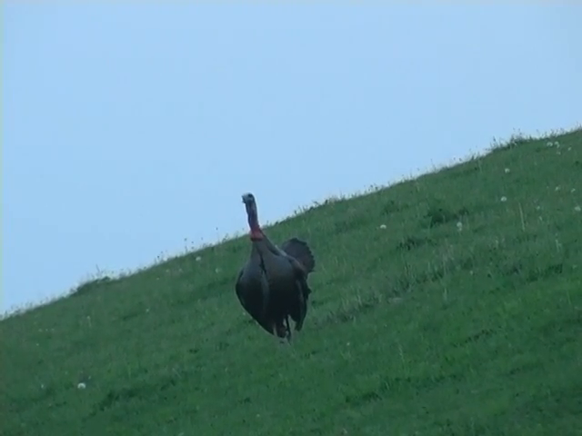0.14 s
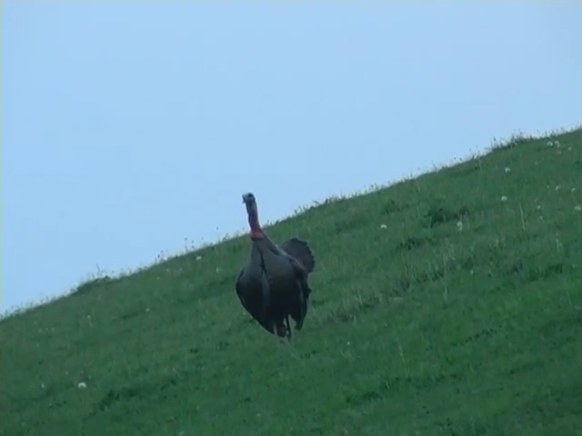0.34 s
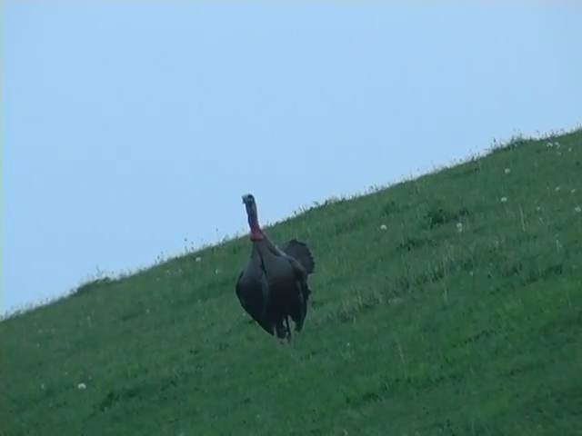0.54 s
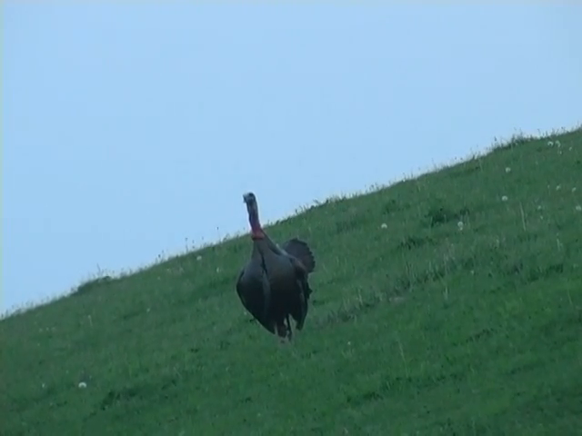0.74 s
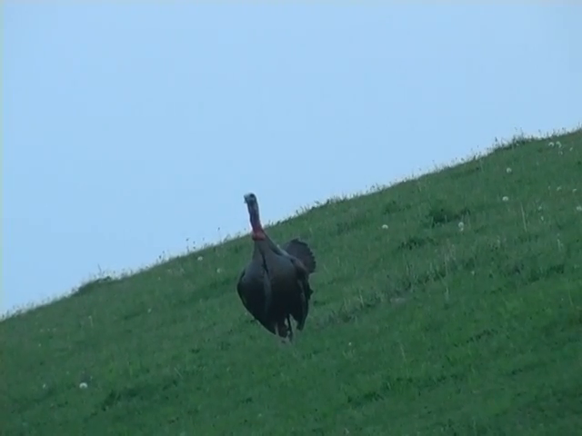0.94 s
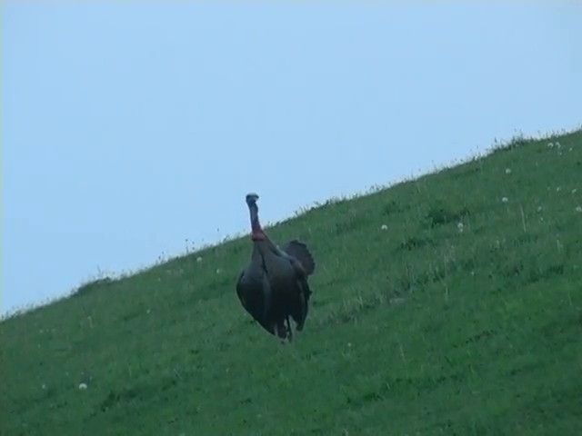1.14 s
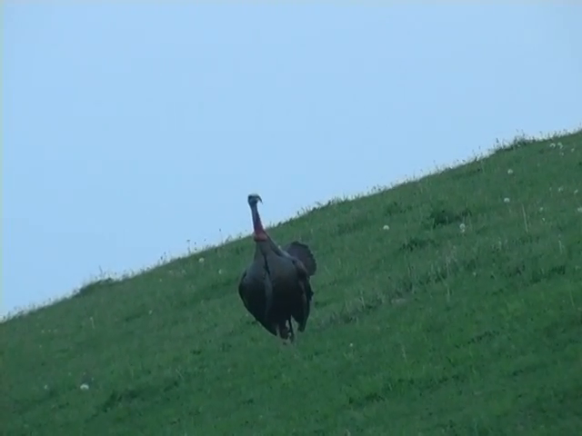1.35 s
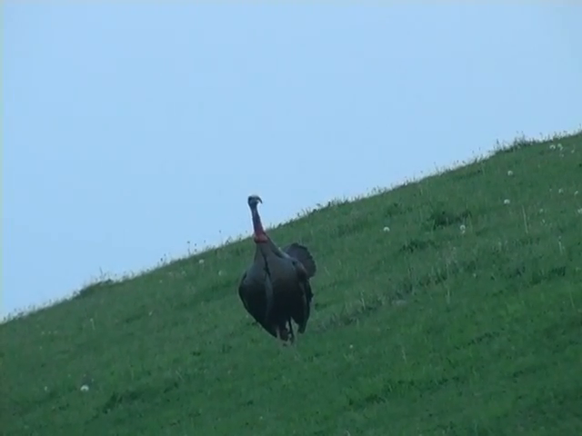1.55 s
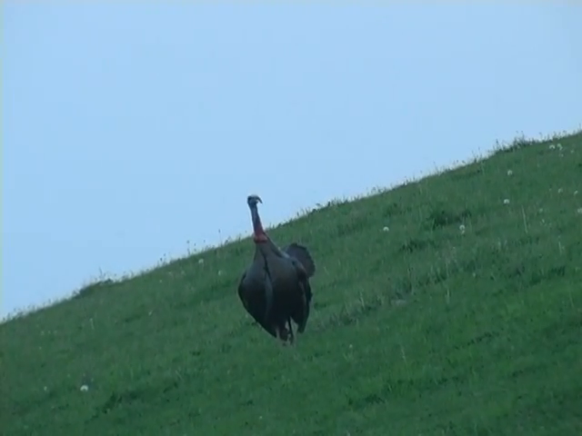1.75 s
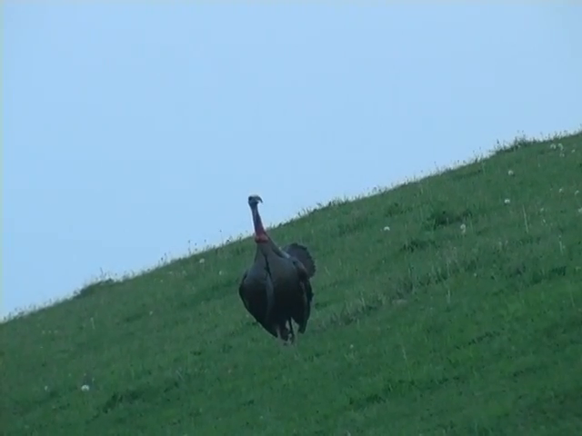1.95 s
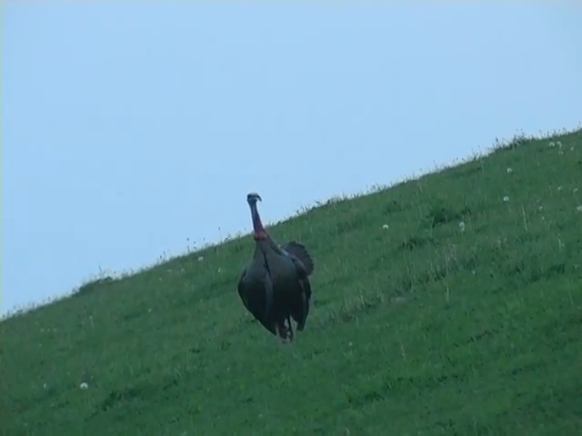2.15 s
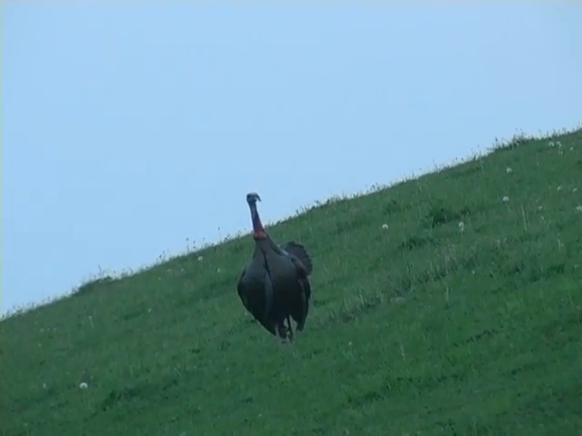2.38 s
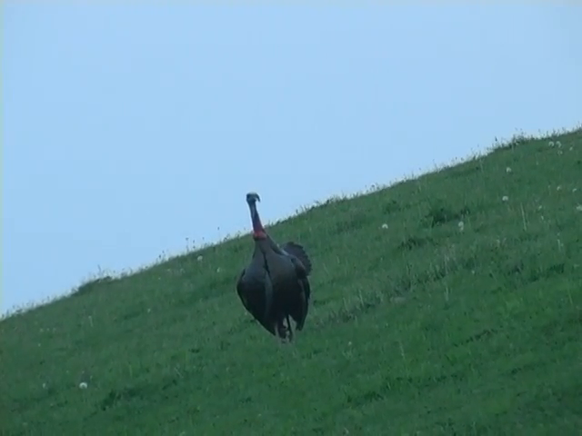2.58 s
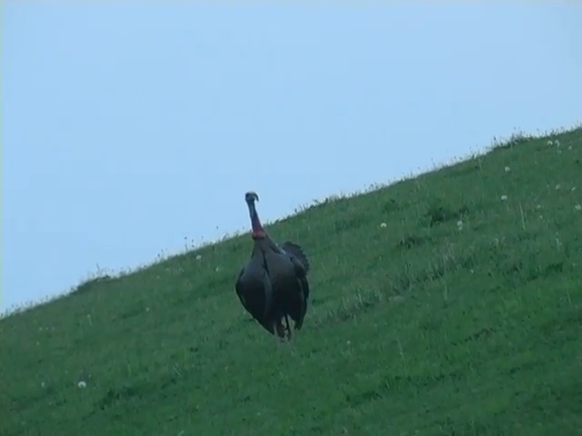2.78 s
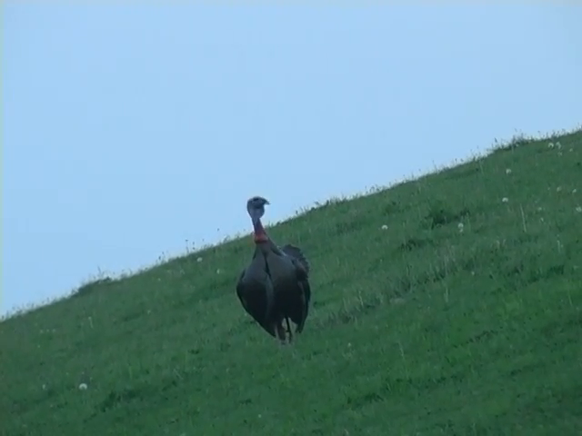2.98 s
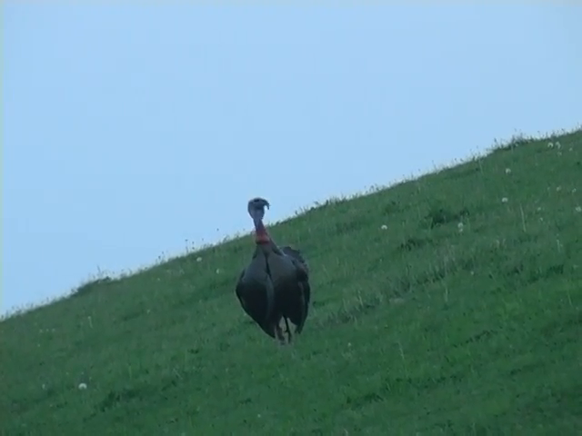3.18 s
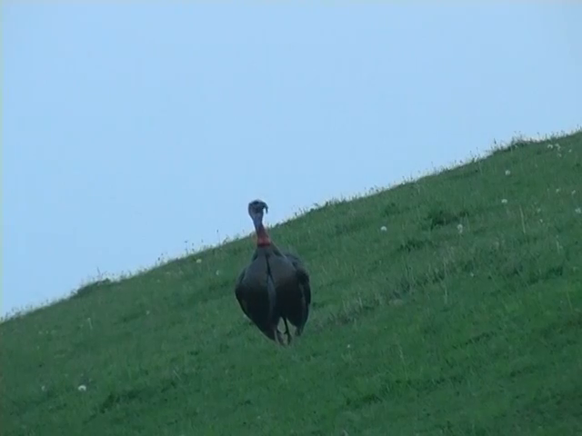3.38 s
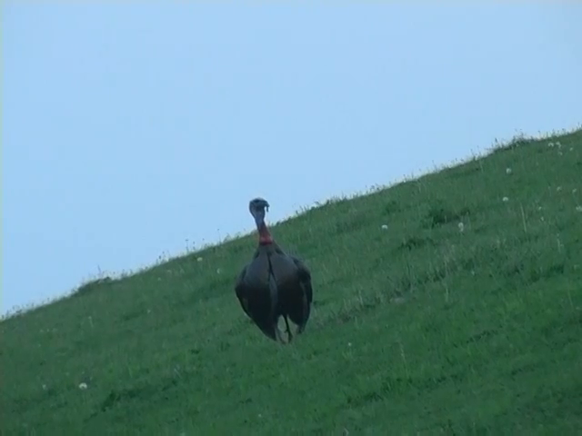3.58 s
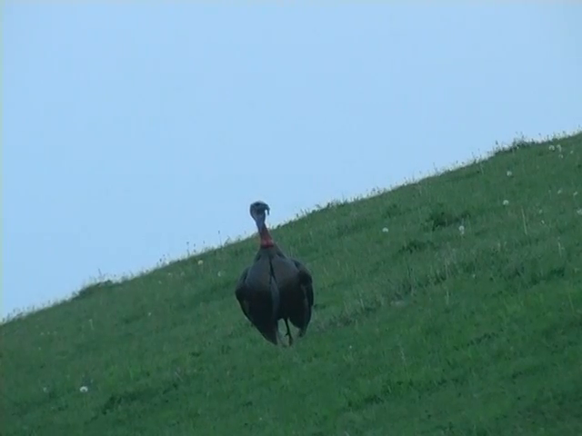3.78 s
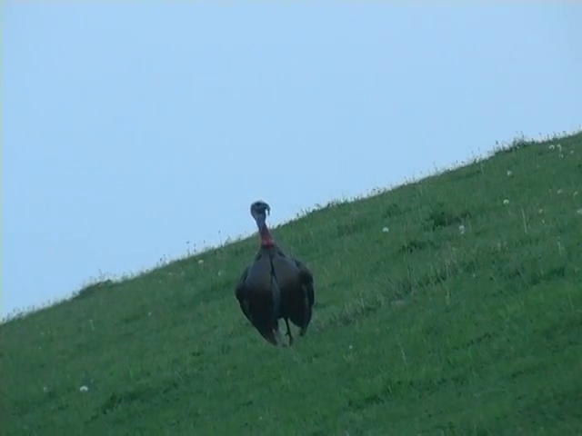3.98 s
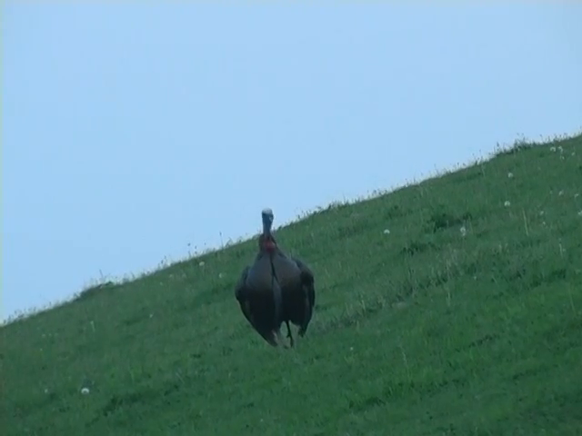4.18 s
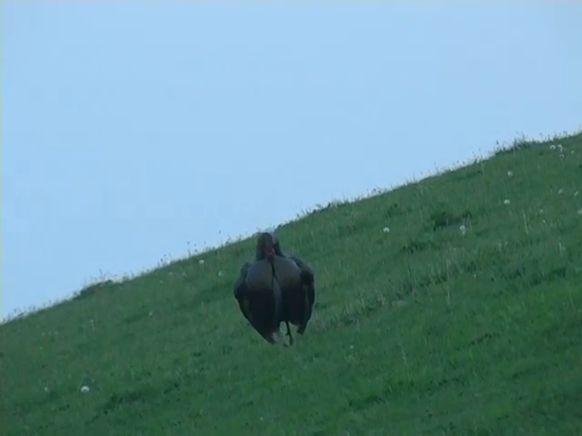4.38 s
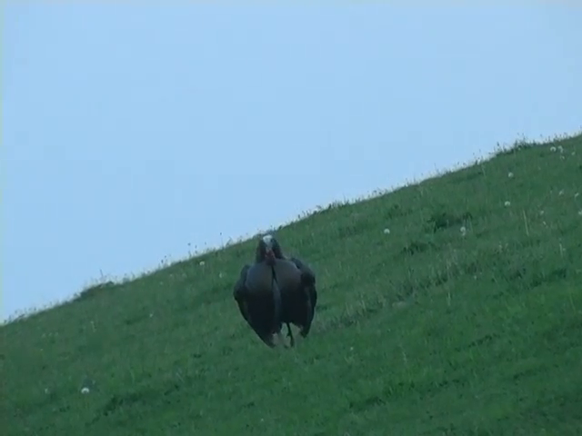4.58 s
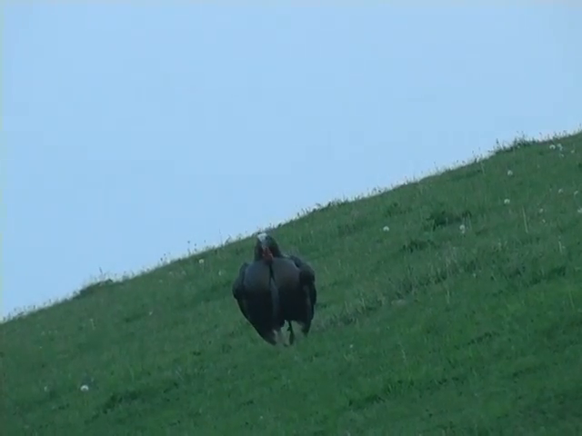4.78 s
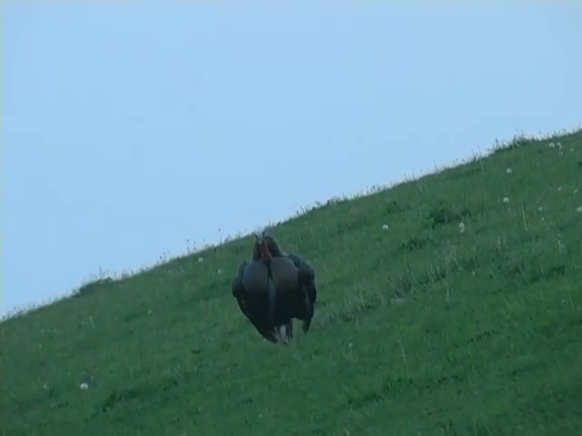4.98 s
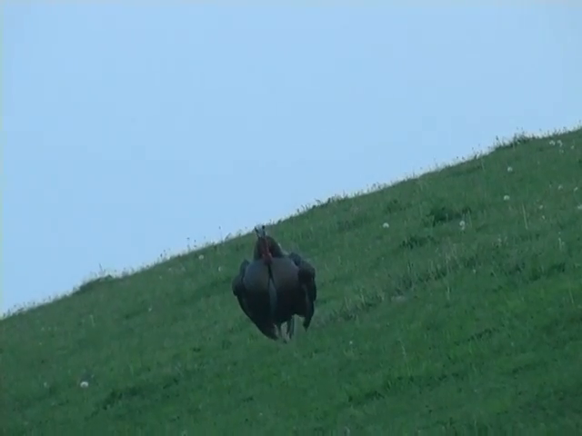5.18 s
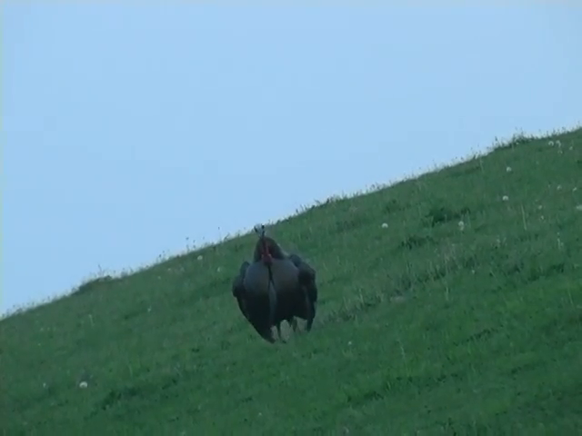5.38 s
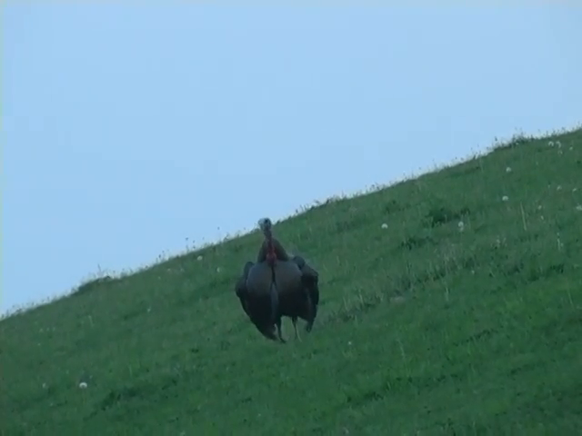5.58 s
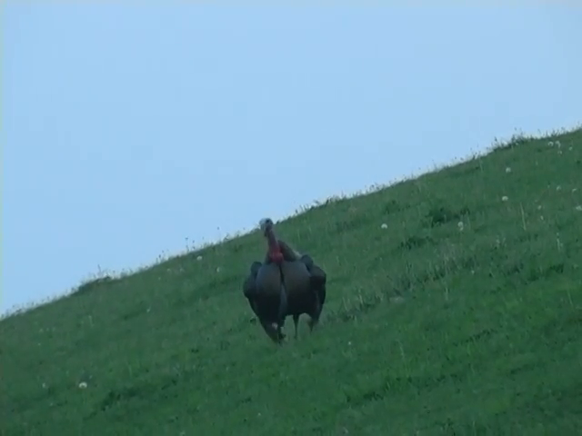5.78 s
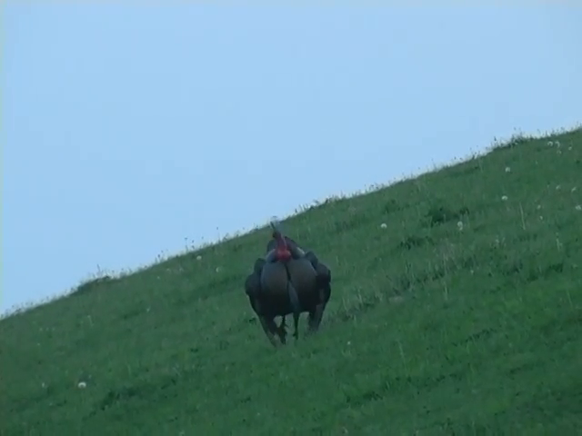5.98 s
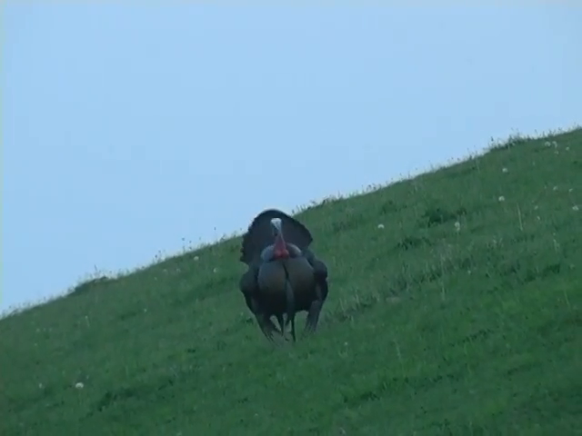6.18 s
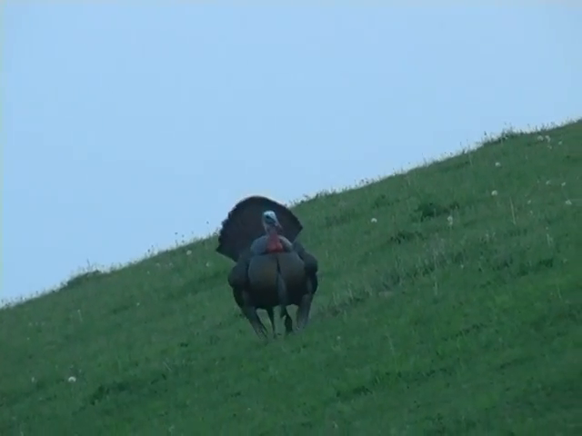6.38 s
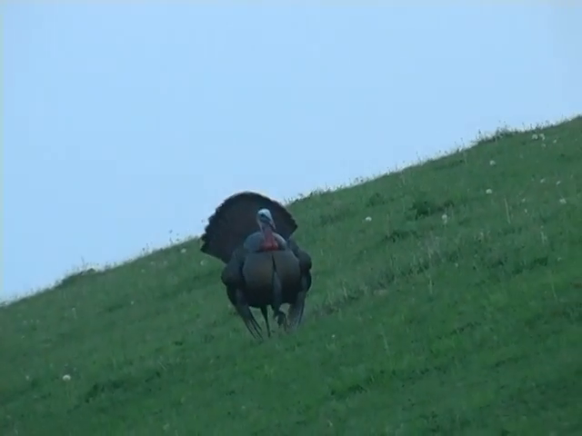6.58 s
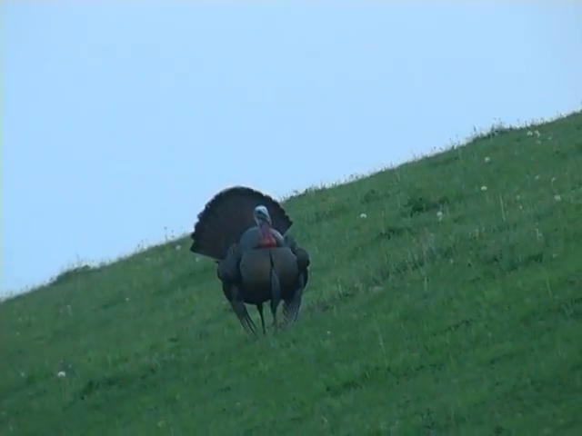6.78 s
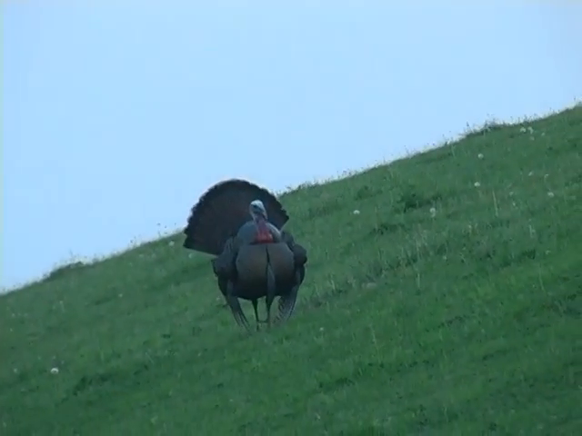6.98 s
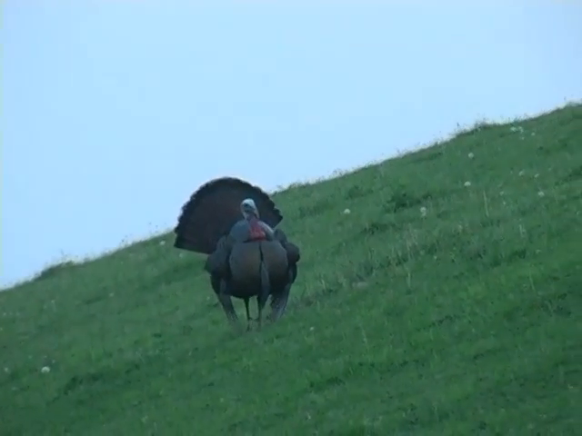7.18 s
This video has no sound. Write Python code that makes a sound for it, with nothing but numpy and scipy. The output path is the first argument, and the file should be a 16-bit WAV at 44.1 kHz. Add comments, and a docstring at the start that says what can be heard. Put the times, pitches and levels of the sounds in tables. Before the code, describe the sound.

Songbirds pipe, whistle and trill on an open hillside over soft air hiss and far engine rumble; midway a turkey gives one loud rattling gobble.

```python
"""On a grassy hillside a wild turkey gobbles once: short yelps, then an uneven, fading rattle of rasps.
Syrinx pulses ring its neck, throat and beak; brief tones on pitch curves make the yelps.
Songbirds to the left whistle, pipe, tick and trill as gliding tones, or wheeze as narrow hiss.
Near growth smears the calls and the slopes return a thin echo, as decaying noise.
Open-air hiss lies behind, a far engine rumbles and hums, and the camera adds a faint whine."""
import sys
import numpy as np
from scipy import signal
from scipy.fft import rfft, irfft
from scipy.io import wavfile
from scipy.ndimage import map_coordinates

SR = 44100
rng = np.random.default_rng(int(sys.argv[2]) if len(sys.argv) > 2 else 0)


def materialize(psi):
    """Save the field psi as 16-bit PCM at rate SR to the path in sys.argv[1].

    A 1-D psi becomes a single channel; in a 2-D psi each row is a channel.
    """
    bounded = np.clip(np.atleast_2d(psi).T, -1, 1)
    quanta = np.round(bounded * 32767).astype(np.int16)
    wavfile.write(sys.argv[1], SR, quanta)


N = 319284

GOBBLE_S = 4.2  # start of the gobble


def rattle():
    """Bursts of syrinx pulses, part steady and part ragged, ring the neck, the throat and the open beak."""
    # the rasps: middle t/s, length t/s, level/dB of throat and beak before the fades
    rasps = [(4.225, 0.023, -46), (4.303, 0.037, -40), (4.371, 0.0074, -46.5), (4.422, 0.017, -43.5),
             (4.463, 0.018, -44), (4.513, 0.044, -43), (4.589, 0.025, -44.5), (4.63, 0.033, -41.5),
             (4.686, 0.029, -39), (4.757, 0.016, -45.5), (4.791, 0.042, -43.5), (4.861, 0.045, -48),
             (4.945, 0.072, -46.5), (5.024, 0.034, -45.5), (5.095, 0.019, -48.5), (5.23, 0.032, -52.5),
             (5.264, 0.022, -58)]
    # throat resonances: f/Hz, width f/Hz, relative level/dB
    throat_modes = [(2150, 230, 4.5), (2440, 260, 7), (3100, 360, 9.5), (3580, 420, 7.5), (4300, 370, 5),
                    (4580, 320, 1)]
    # beak resonances: f/Hz, width f/Hz, relative level/dB
    beak_modes = [(5300, 260, -2.5), (5920, 240, 2), (6450, 340, 0), (7150, 740, -5), (8150, 1740, -16.5)]
    # one more throat resonance steps down as the neck stretches: t/s, f/Hz
    gullet_path = [(4.53, 1830), (4.62, 1555)]
    gullet_width_hz, gullet_db = 230, 6.5
    t = np.arange(N) / SR

    # the lowest resonance drops as the neck shoots out, then sinks steadily
    drop_hz, drop_s, sag_hz_per_s = 271.4, .11, 125
    age = np.maximum(t - GOBBLE_S, 0)
    neck_hz = 1074.7 + drop_hz * np.exp(-age / drop_s) - sag_hz_per_s * age

    def pulses(jitter):
        """One click a cycle, about an octave under the neck resonance, at uneven levels."""
        turns = np.cumsum(neck_hz / 2 * (1 + jitter * wander(N, 150))) / SR
        clicks = np.diff(np.floor(turns), prepend=0)
        return unit(clicks * amp(4 * wander(N, 300)))

    steady, ragged = pulses(jitter=.03), pulses(jitter=.35)
    low_cut = signal.butter(4, 650, "high", fs=SR, output="sos")
    drive = signal.sosfilt(low_cut, steady + 0.8 * ragged)

    neck_width_hz = 190
    shaky_neck_hz = neck_hz * (1 + 0.066 * wander(N, 90))
    neck = resonate(drive, shaky_neck_hz, neck_width_hz)
    neck = resonate(neck, shaky_neck_hz, 2 * neck_width_hz)
    shake = 1 + 0.023 * wander(N, 22)  # the shaking head detunes throat and beak
    throat, beak = (sum(amp(db) * band(drive, hz * shake, width) for hz, width, db in modes)
                    for modes in (throat_modes, beak_modes))
    gullet_hz = curves(gullet_path, t)[0] * shake
    throat = throat + amp(gullet_db) * band(drive, gullet_hz, gullet_width_hz)

    # under and between the bursts the neck keeps gurgling
    gurgle_db, gurgle_throat_db, gurgle_swing_db = -57, -4, 3.0
    end_s, release_s = 5.38, 0.16
    gurgle = unit(neck) + amp(gurgle_throat_db) * unit(throat)
    out = gurgle * amp(gurgle_db + gurgle_swing_db * wander(N, 50))
    out *= (t > GOBBLE_S) * np.clip((end_s - t) / release_s, 0, 1)

    flutter = amp(3 * wander(N, 200))
    for s, length, db in rasps:
        neck_db = -44 - 12 * (s - GOBBLE_S)  # the neck's ring fades by 12 dB/s
        open_db = 2.5 + 0.7 * (db + 39)  # a stronger rasp opens the beak wider and gains treble
        span = slice(round((s - length / 2) * SR), round((s + length / 2) * SR))
        voice = (throat[span] + amp(open_db) * beak[span]) * flutter[span]
        burst = amp(db) * unit(voice) + amp(neck_db) * unit(neck[span])
        add(out, s - length / 2, burst * signal.windows.tukey(len(burst), 0.58))
    return out


def yelps():
    """The voice locks into short tones with weak overtones, hoarse in the first outburst and clearer later."""
    # the tones: middle t/s, length t/s, level/dB before the fades, central f/Hz
    yelp_rows = [(4.216, 0.019, -40.5, 1416), (4.236, 0.029, -36.5, 1500), (4.238, 0.018, -35, 1810),
                 (4.283, .03, -37.5, 1356), (4.302, 0.03, -39, 1419), (4.413, 0.01, -43, 3150),
                 (4.457, 0.0099, -40, 3100), (4.471, 0.021, -43, 1853), (4.677, 0.02, -39.5, 3150),
                 (4.951, 0.036, -44.5, 3160), (4.966, 0.015, -43, 3630), (5.102, 0.01, -47, 3160),
                 (5.311, 0.014, -49.5, 3120), (5.314, 0.025, -47.5, 1590)]
    rough_first, rough_later, first_outburst_s = 0.62, 0.2, .15
    rise = 0.17  # share of its pitch by which a tone of roughness 1 would climb
    flutter_db, overtone_db = 7, -21  # flutter at roughness 1
    out = np.zeros(N)
    for s, length, db, pitch_hz in yelp_rows:
        size = round(length * SR)
        rough = rough_first if s < GOBBLE_S + first_outburst_s else rough_later
        hz = pitch_hz * (1 + rise * rough * np.linspace(-.5, .5, size))
        hz = hz * (1 + .2 * rough * np.tanh(wander(size, 600)))
        phase = 2 * np.pi * np.cumsum(hz) / SR
        # only the low tones have a third harmonic
        overtones = np.sin(2 * phase) + .5 * np.sin(3 * phase) * (pitch_hz < 2000)
        tone = np.sin(phase) + amp(overtone_db) * overtones
        tone = unit(tone * amp(flutter_db * rough * wander(size, 342)))
        add(out, s - length / 2, amp(db) * tone * signal.windows.tukey(size, .7))
    return out


def syllables(names, shake, hiss_db, hiss_width=2200):
    """Quick syllables that the birds repeat; a shaking pitch and a spray of hiss make them buzz."""
    # pitch curves by name: t/s from the start, f/Hz, relative level/dB
    shapes = { "dip": [(0, 5400, -8), (.012, 3650, -1), (.032, 3100, -8), (.056, 2600, -7), (.073, 3100, 1),
              (.097, 4080, 0), (.113, 4270, -6), (.14, 4200, -20)], "arch": [(0, 2650, -9), (.04, 3250, -3),
              (.06, 3400, -3), (.088, 3920, 1), (.1, 3700, 0), (.111, 2300, -8), (.128, 1850, -20)],
              "slide": [(0, 4900, -5), (.05, 3650, -2), (.175, 2200, 1), (.28, 1800, -4)],
              "pip": [(0, 1880, -10), (.018, 2070, 0), (.045, 1720, -6)]}
    # when they are sung: t/s, name, relative level/dB
    song = [(.094, "dip", -45), (.29, "arch", -50.5), (.355, "dip", -46.5), (.475, "arch", -49),
            (.626, "dip", -47), (0.736, "pip", -56), (0.906, "dip", -48), (0.916, "pip", -59),
            (1.715, "slide", -62.5), (2.246, "slide", -62.5), (2.802, "slide", -64.5), (3.787, "dip", -49),
            (4.052, "dip", -48), (4.324, "dip", -48.5), (5.945, "pip", -59), (6.039, "arch", -52),
            (6.238, "arch", -45), (6.452, "arch", -48), (6.689, "pip", -58), (6.843, "pip", -55),
            (7.004, "pip", -52.5)]
    # as the arch drops, the throat favours the octave: t/s from the start, octave level/dB
    arch_octave = [(.05, -18), (.1, -16.5), (.111, 9.5)]
    out = np.zeros(N)
    for s, name, db in song:
        if name in names:
            shape = shapes[name]
            t = np.arange(0, shape[-1][0], 1 / SR)
            hz, shape_db = curves(shape, t)
            octave_db = curves(arch_octave, t)[0] if name == "arch" else -np.inf
            tone = chirp(hz, db + shape_db, octave_db, shake)
            hiss = unit(band(rng.standard_normal(len(hz)), hz, hiss_width))
            add(out, s, tone + amp(db + shape_db + hiss_db) * hiss)
    return out


def upsweeps():
    """Thin, wheezy notes that start hoarse and clear as they climb by a fixed interval."""
    # start t/s, relative level/dB, first f/Hz
    sweeps = [(.705, -60.5, 4300), (.912, -63, 4050), (1.148, -64.5, 5300), (5.448, -57.5, 4450),
              (5.665, -57.5, 4400), (5.866, -58.5, 4370), (6.205, -65, 5750), (6.425, -63.5, 5850),
              (6.62, -63, 5350)]
    length_s, ratio, shake = 0.054, 1.39, 0.113
    out = np.zeros(N)
    for s, db, first_hz in sweeps:
        hz = glide(length_s, first_hz, first_hz * ratio)
        note = chirp(hz, db, shake=shake * np.linspace(1, 0, len(hz)))
        add(out, s, note * signal.windows.tukey(len(hz), .5))
    return out


def wheezes():
    """Breathy, falling wheezes of a small bird: noise through a sinking resonance."""
    # start t/s, length t/s, relative level/dB
    breaths = [(0.311, 0.078, -60), (0.502, 0.1, -62), (5.08, 0.37, -63.5), (6.073, 0.24, -57.5)]
    first_hz, last_hz, width_hz = 5340, 4800, 3200
    out = np.zeros(N)
    for s, length, db in breaths:
        hz = glide(length, first_hz, last_hz)
        hiss = band(rng.standard_normal(len(hz)), hz, width_hz)
        hiss = band(hiss, hz, width_hz)
        add(out, s, amp(db) * unit(hiss) * signal.windows.tukey(len(hz), .5))
    return out


def whistles():
    """Single clear notes: slurs glide and settle on another pitch, lilts rise to a top and fall back."""
    # slurs: start t/s, length t/s, level/dB, first f/Hz, last f/Hz
    slurs = [(0, 0.078, -58.5, 4200, 5220), (0.954, 0.12, -56, 3130, 2980), (1.264, .1, -60.5, 2360, 2080),
             (1.432, 0.079, -58.5, 2440, 2170), (1.713, .071, -56, 3010, 2710),
             (2.164, 0.087, -55.5, 3000, 2690), (3.185, 0.096, -64, 2850, 2610),
             (3.209, 0.071, -62.5, 2200, 1696), (3.585, 0.053, -55, 2760, 4430),
             (3.709, 0.072, -60, 2250, 1755), (4.798, 0.052, -59, 4770, 5430),
             (5.4, 0.075, -58.5, 4750, 3240), (5.646, 0.083, -59, 2700, 2100),
             (5.833, 0.2, -59.5, 2795, 2465), (5.859, 0.03, -55, 4780, 3730),
             (5.914, 0.15, -73.5, 6400, 6700), (6.462, 0.1, -56, 2950, 2605),
             (6.614, 0.028, -51.5, 3200, 2430), (6.745, 0.075, -53, 2950, 2700),
             (6.974, 0.086, -55, 3800, 3240), (7.042, 0.076, -51.5, 2740, 2440)]
    # lilts: start t/s, length t/s, level/dB, top f/Hz
    lilts = [(1.578, 0.037, -55.5, 2620), (3.4, 0.21, -59, 2706), (3.663, 0.1, -56, 2513),
             (3.936, 0.11, -57, 2470), (5.575, .095, -49.5, 3350), (5.731, 0.047, -52, 2947),
             (7.186, 0.042, -52, 3040)]
    out = np.zeros(N)
    for s, length, db, first_hz, last_hz in slurs:
        add(out, s, whistle(glide(length, first_hz, last_hz), db))
    for s, length, db, top_hz in lilts:
        add(out, s, whistle(bow(length, top_hz, bend=0.22), db))
    return out


def flicks():
    """Very short notes that flick upward, alone or strung into a warble."""
    # start t/s, level/dB, first f/Hz
    flick_rows = [(2.925, -62, 2940), (3.447, -58, 2530), (5.488, -54, 2930), (5.51, -50.5, 2624),
                  (5.537, -48.5, 2496)]
    length_s, ratio = 0.0242, 1.22
    out = np.zeros(N)
    for s, db, first_hz in flick_rows:
        add(out, s, whistle(glide(length_s, first_hz, first_hz * ratio), db))
    return out


def piping(count=5):
    """One bird pipes an even run of long, low notes that each creep upward and fade."""
    first_s, gap_s, note_s = -.02, .268, 0.196  # add() moves the first note to 0 s
    first_hz, last_hz, start_db, fade_db = 2365, 2538, -54.5, -4
    out = np.zeros(N)
    for k in range(count):
        hz = glide(note_s, first_hz, last_hz)
        db = start_db + np.linspace(0, fade_db, len(hz))
        add(out, first_s + k * gap_s, chirp(hz, db, shake=0.013))
    return out


def trill():
    """A falling buzz made of rapid downward sweeps."""
    # the path of the buzz: t/s, f/Hz, level/dB before the throb
    path = [(1.735, 3674, -52), (1.87, 3238, -49.5), (1.959, 2932, -49.5), (2.038, 2700, -53),
            (2.08, 2650, -73)]
    rate_hz, depth, throb = 58, 0.098, 0.24  # depth is a share of the pitch, throb an exponent
    t = np.arange(path[0][0], path[-1][0], 1 / SR)
    hz, db = curves(path, t)
    cycle = (t - t[0]) * rate_hz % 1
    sweep = chirp(hz * (1 + depth * (1 - 2 * cycle)), db)
    out = np.zeros(N)
    add(out, t[0], sweep * np.sin(np.pi * cycle) ** throb)
    return out


def ticks():
    """Tiny, high, scratchy falling notes in even runs."""
    # runs: first t/s, last t/s, level/dB
    runs = [(1.578, 1.9, -72), (2.66, 2.7, -76), (2.862, 3.08, -70.5), (4.075, 4.2, -74)]
    gap_s, length_s, first_hz, last_hz = .083, 0.024, 9500, 8470
    out = np.zeros(N)
    for first, last, db in runs:
        for s in np.arange(first, last, gap_s):
            add(out, s, chirp(glide(length_s, first_hz, last_hz), db, shake=0.045))
    return out


def far_birds(count=300):
    """A chorus from farther off: random chirps, up and down, that blend into a warble."""
    # t/s, level/dB of the loudest chirps
    chorus = [(.6, -58.5), (1.4, -82), (4.8, -75), (6.3, -59), (7.1, -60)]
    u = np.linspace(-1, 1, round(.06 * SR))
    out = np.zeros(N)
    for k, (when, pitch, bend, quiet) in enumerate(rng.random((count, 4))):
        s = (k + when) / count * N / SR
        hz = 2650 * 1.5 ** pitch * (1 + .13 * (2 * bend - 1) * u)
        db = curves(chorus, s)[0] - 10 * quiet
        add(out, s, chirp(hz, db) * np.hanning(len(u)))
    return out


def background():
    """Open-air hiss as shaped noise, with the rumble and wavering tones of a far engine."""
    # hiss spectrum: f/Hz, relative level/dB per Hz
    air = [(180, -26), (300, -2), (500, -1.5), (1050, 0), (1950, -12.5), (2800, -8), (4200, -15.5),
           (7000, -22.5), (10300, -21.5), (15700, -26.5)]
    # rumble spectrum: f/Hz, relative level/dB per Hz
    rumble = [(20, -32), (48, -10), (60, 0.5), (73, 3), (88, 0.5), (165, -4), (240, -11.5), (300, -22.5),
              (900, -109)]
    # engine tones: f/Hz, level/dB about which each wavers
    engine = [(58, -58), (72.4, -53.5), (144.9, -50.5), (252, -65)]
    # likeness of the two microphone ports: f/Hz, 0 to 1
    likeness = [(60, 0.99), (300, 1), (1000, 0.82), (3000, 0.23), (8000, 0.075)]
    # lean to the left: f/Hz, left minus right level/dB
    lean = [(60, 5), (1400, 3.8), (3100, 0), (7000, -0.5)]
    air_db, rumble_db, waver_db, drift = -55, -45, 2.0, 0.00604
    hz = np.fft.rfftfreq(N, 1 / SR)
    a, b = rfft(rng.standard_normal((2, N)))
    same = np.clip(read(likeness, hz), 0, 1)
    pair = np.array([a, same * a + np.sqrt(1 - same ** 2) * b])
    noise = amp(air_db) * unit(irfft(pair * amp(read(air, hz)), N))
    noise += amp(rumble_db) * unit(irfft(pair * amp(read(rumble, hz)), N))
    hum = np.zeros(N)
    for f, db in engine:
        level = amp(db + waver_db * wander(N, 2.2))
        phase = 2 * np.pi * np.cumsum(f * (1 + drift * wander(N, 3))) / SR
        hum += np.sqrt(2) * level * np.sin(phase)
    return ports(noise + hum, read(lean, hz), 1.0)


def whine():
    """Thin steady tones from the camera, alike in both ports."""
    # f/Hz, level/dB
    tones = [(4495, -82), (5394, -79), (5694, -82), (9340, -88), (15732, -83)]
    t = np.arange(N) / SR
    return sum(np.sqrt(2) * amp(db) * np.sin(2 * np.pi * (hz * t + rng.random())) for hz, db in tones)


def place(x, lean_db, side, echo_db, scatter_db):
    """A source to the left reaches the right port later and weaker; near growth smears it, slopes echo it."""
    # decay of the echo: f/Hz, time to fall by 60 dB t/s
    echo_decay = [(500, 0.27), (1200, 1), (6000, .8), (12000, 0.13)]
    hz, t, z = signal.stft(rng.standard_normal((2, SR)), SR, nperseg=256)
    tail_gain = amp(-60 * t / read(echo_decay, hz)[:, None]) * (t > .008)
    tail = signal.istft(z * tail_gain, SR, nperseg=256)[1]
    # the smear uses the same noise in swapped ports and dies within 0.087 s
    near = signal.istft(z[::-1] * amp(-60 * t / 0.087), SR, nperseg=256)[1]
    paths = amp(echo_db) * tail / np.linalg.norm(tail[0])
    paths += amp(scatter_db) * near / np.linalg.norm(near[0])
    paths[1] = .6 * paths[0] + .8 * paths[1]  # the ports hear partly the same reflections
    pair = x + signal.fftconvolve(x[None], paths, axes=1)[:, :N]
    return ports(pair, lean_db, side)


def ports(pair, lean_db, side):
    """Level and phase difference between the two microphone ports."""
    # lead of the left port at side 1: f/Hz, phase/radians
    lead = [(60, .05), (250, 0.81), (550, 1.46), (3000, 1.105)]
    lag = side * read(lead, np.fft.rfftfreq(N, 1 / SR))
    left, right = rfft(pair)
    left = left * amp(lean_db / 2)
    right = right * np.exp(-1j * lag) * amp(-lean_db / 2)
    return irfft(np.array([left, right]), N)


def chirp(hz, db, overtone_db=-38, shake=0.0065, flutter_db=2):
    """A songbird's near-pure tone on a pitch curve, with a shaking pitch and a fluttering level."""
    size = len(hz)
    phase = 2 * np.pi * np.cumsum(hz * (1 + shake * wander(size, 261.7))) / SR
    tone = np.sin(phase) + amp(overtone_db) * np.sin(2 * phase)
    level = amp(db + flutter_db * wander(size, 45.0))
    return np.sqrt(2) * tone * level * signal.windows.tukey(size, .1)


def whistle(hz, db):
    """One clear whistled note, swelling and fading."""
    return chirp(hz, db, shake=.012) * signal.windows.tukey(len(hz), .4)


def glide(length, first_hz, last_hz):
    """A pitch that moves fast at first and settles, over 1.566 time constants."""
    left = np.exp(-1.566 * np.linspace(0, 1, round(length * SR)))
    return last_hz + (first_hz - last_hz) * (left - left[-1]) / (1 - left[-1])


def bow(length, top_hz, bend):
    """A pitch that rises to its top and falls back; both ends lie a share bend under it."""
    return top_hz * (1 - bend * np.linspace(-1, 1, round(length * SR)) ** 2)


def band(x, hz, width):
    """A resonance applied twice, for steep sides."""
    return resonate(resonate(x, hz, width), hz, width)


def resonate(x, hz, width):
    """A resonance of gain 1 that may follow a curve: shift it to 0 Hz, smooth, shift back."""
    turn = np.exp(2j * np.pi * np.cumsum(hz * np.ones(len(x))) / SR)
    r = np.exp(-np.pi * width / SR)
    return 2 * (turn * signal.lfilter([1 - r], [1, -r], x / turn + 1e-18)).real


def wander(size, hz):
    """A smooth random curve of rms near 1 that moves up to hz times a second."""
    at = np.arange(size) * 2 * hz / SR
    return map_coordinates(rng.standard_normal(int(at[-1]) + 4), [at + 1], order=3, mode="nearest")


def amp(db):
    """Decibels to gain."""
    return 10 ** (np.asarray(db) / 20)


def unit(x):
    """Scales to rms 1."""
    return x / np.sqrt(np.mean(x ** 2) + 1e-20)


def read(points, hz):
    """Reads a spectrum on a log-frequency axis."""
    f, value = np.transpose(points)
    return np.interp(np.log(hz + 1), np.log(f + 1), value)


def curves(rows, t):
    """Reads every column of a time table at the times t."""
    s, *columns = np.transpose(rows)
    return [np.interp(t, s, c) for c in columns]


def add(mix, s, sound):
    """Mixes a sound in at s seconds, or at 0 if s is negative."""
    part = mix[max(round(s * SR), 0):][:len(sound)]
    part += sound[:len(part)]


def scene():
    """The turkey nearer to straight ahead, the songbirds to the left and farther away."""
    turkey = place(rattle() + yelps(), lean_db=2.0, side=0.73, echo_db=-12.5, scatter_db=-5.5)

    buzzy = syllables(["dip"], shake=0.0426, hiss_db=-12.5)
    buzzy += syllables(["arch"], shake=0.0201, hiss_db=-10.5)
    buzzy += upsweeps() + wheezes()
    birds = place(amp(-4.0) * buzzy + far_birds(), lean_db=5.0, side=1.0, echo_db=-5.5, scatter_db=-2.0)

    pure = syllables(["slide", "pip"], shake=0.0075, hiss_db=-40)
    pure += whistles() + flicks() + piping() + trill() + ticks()
    birds += place(pure, lean_db=5.5, side=0.91, echo_db=-6.0, scatter_db=-4.0)
    return turkey + birds + background() + whine()


def record(dry):
    """The recorder's band limit: a steep low-pass."""
    edge_hz = 15830
    low_pass = signal.firwin(1023, edge_hz, window=("kaiser", 9), fs=SR)
    return signal.oaconvolve(dry, low_pass[None], "same")


dry = scene()
out = record(dry)
materialize(out)
```